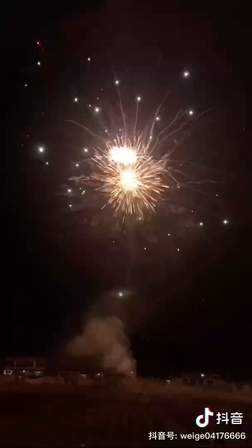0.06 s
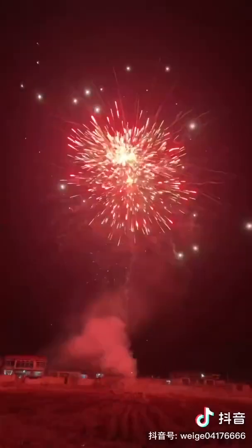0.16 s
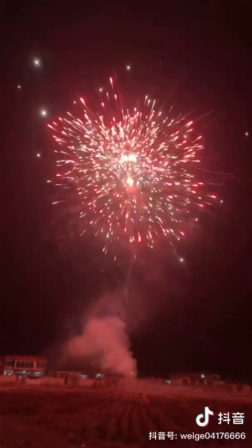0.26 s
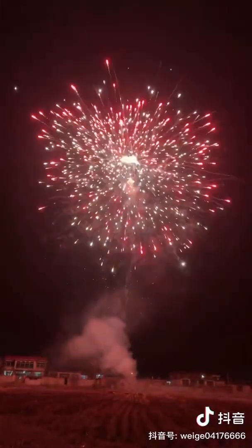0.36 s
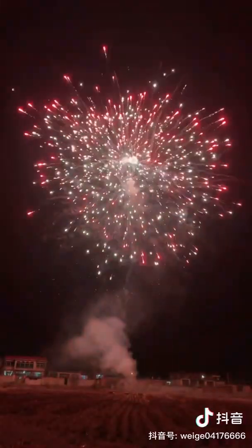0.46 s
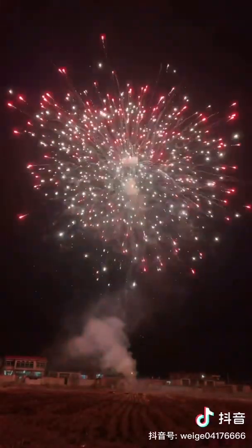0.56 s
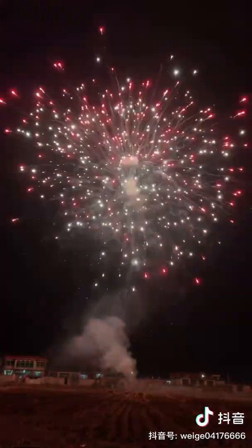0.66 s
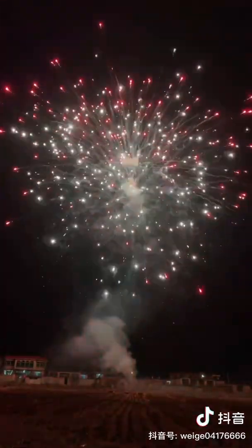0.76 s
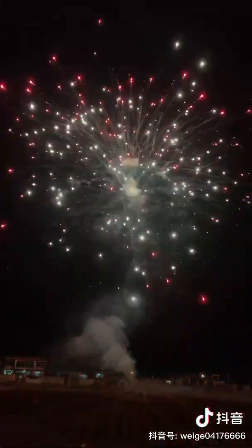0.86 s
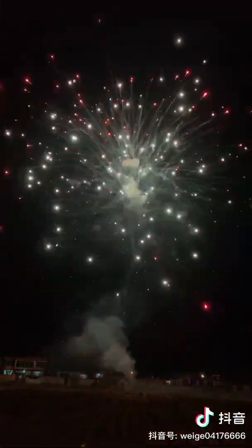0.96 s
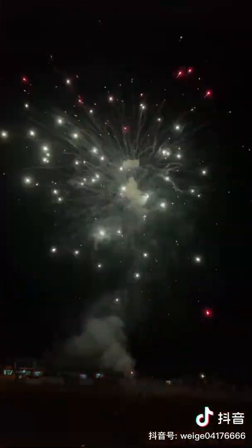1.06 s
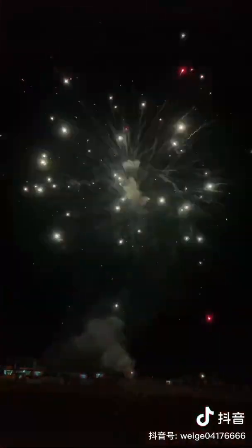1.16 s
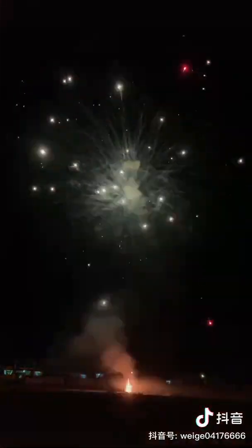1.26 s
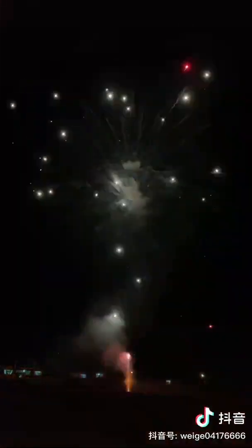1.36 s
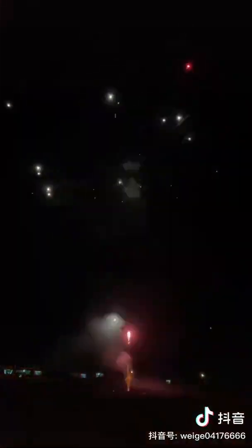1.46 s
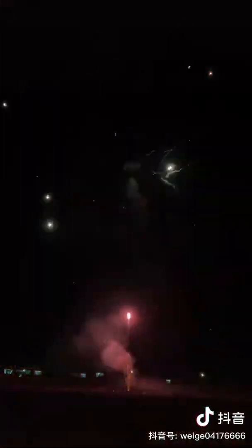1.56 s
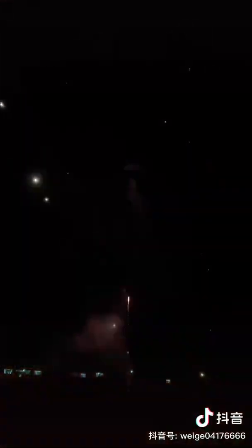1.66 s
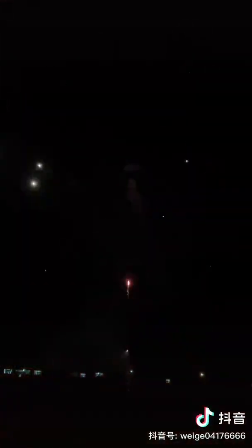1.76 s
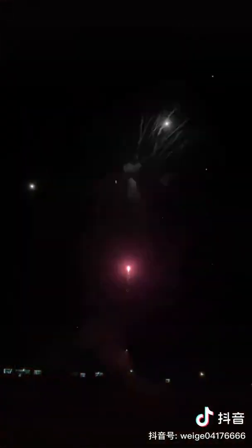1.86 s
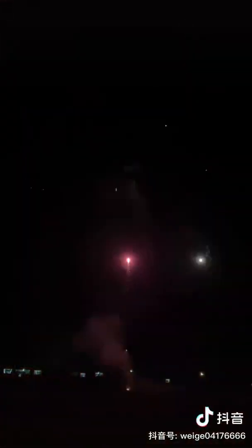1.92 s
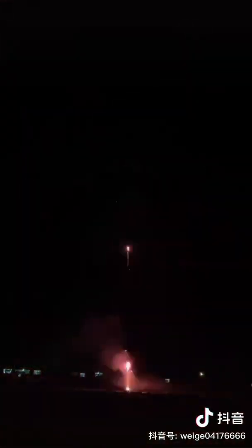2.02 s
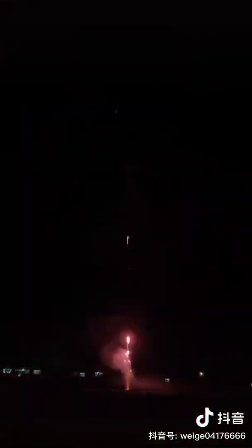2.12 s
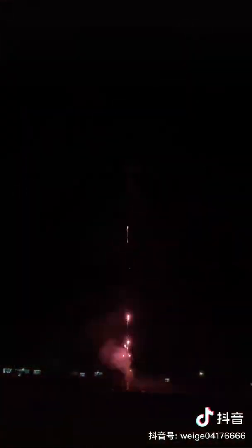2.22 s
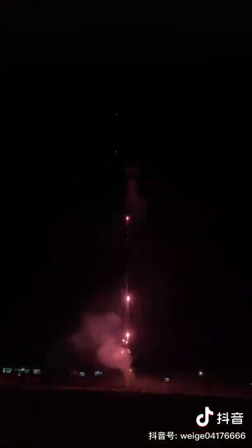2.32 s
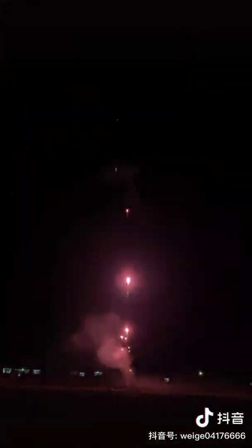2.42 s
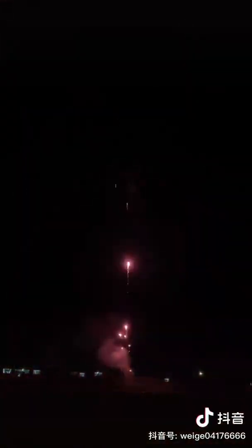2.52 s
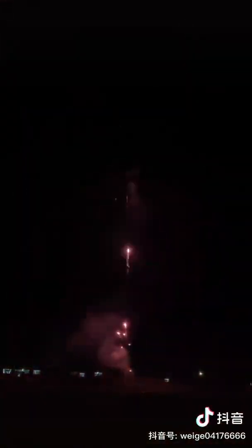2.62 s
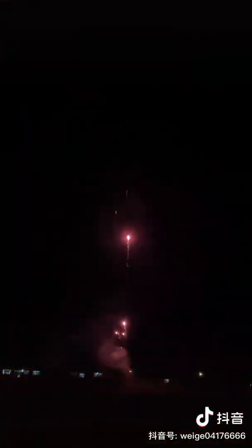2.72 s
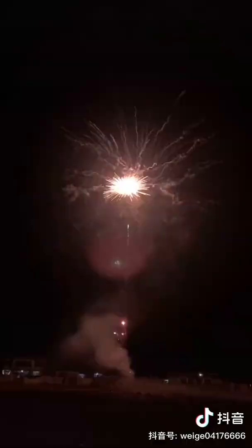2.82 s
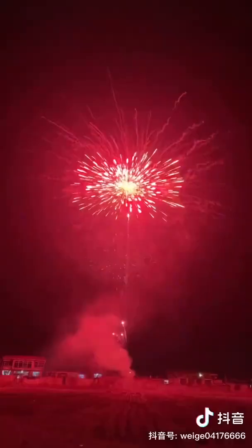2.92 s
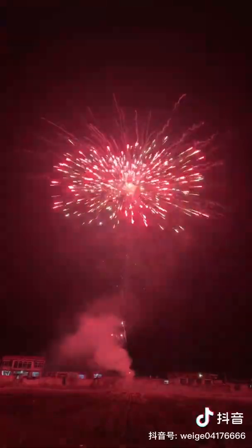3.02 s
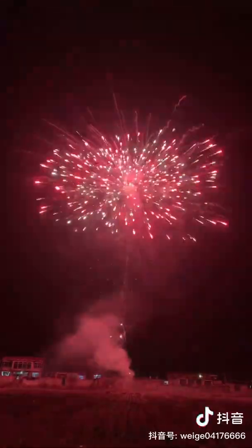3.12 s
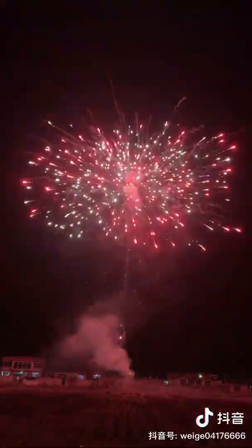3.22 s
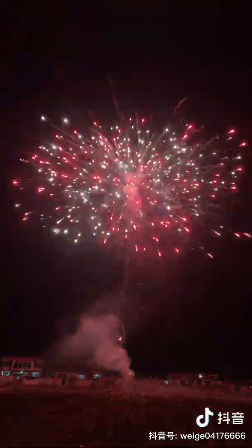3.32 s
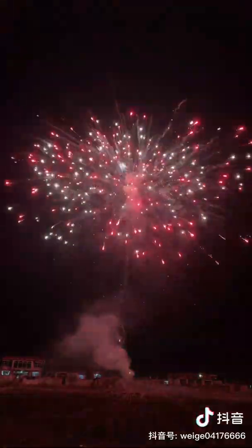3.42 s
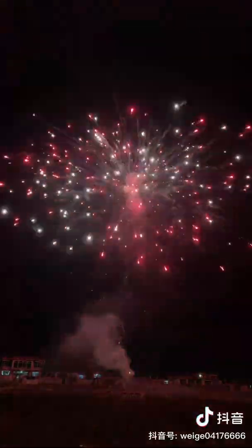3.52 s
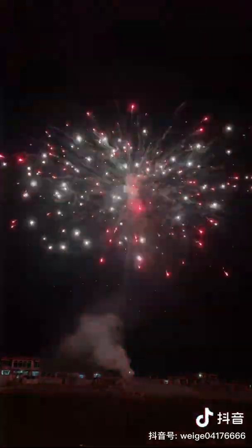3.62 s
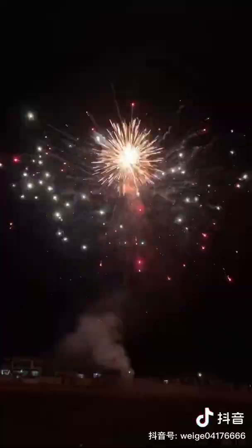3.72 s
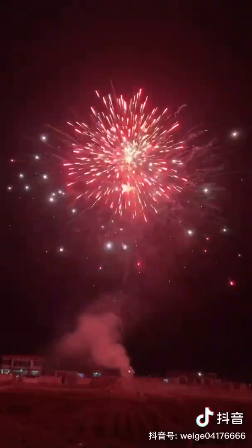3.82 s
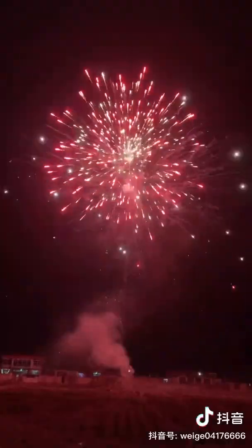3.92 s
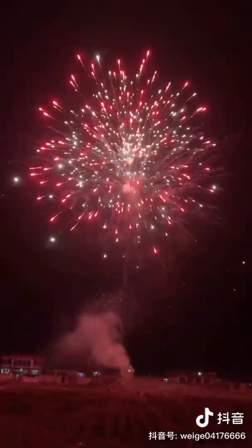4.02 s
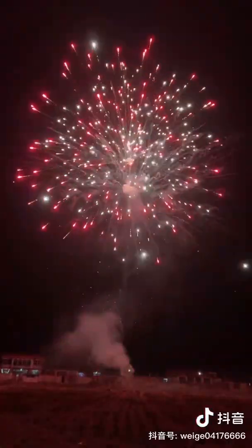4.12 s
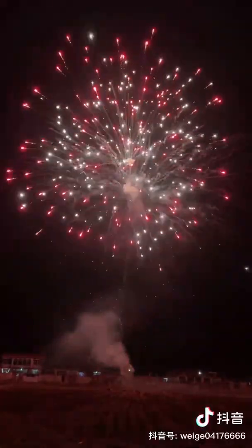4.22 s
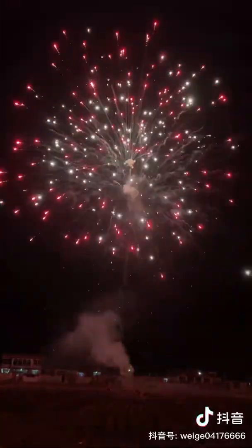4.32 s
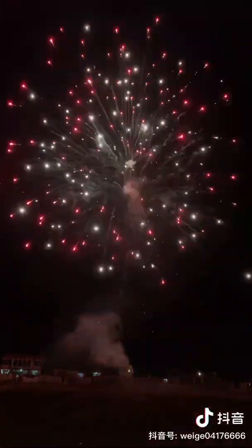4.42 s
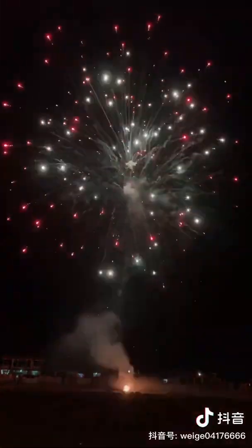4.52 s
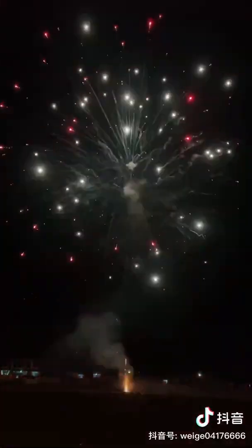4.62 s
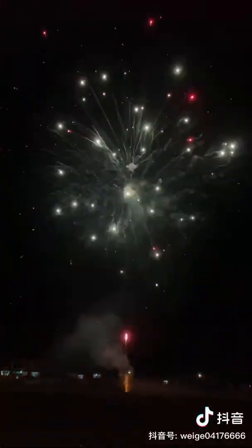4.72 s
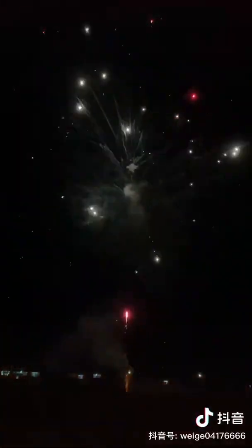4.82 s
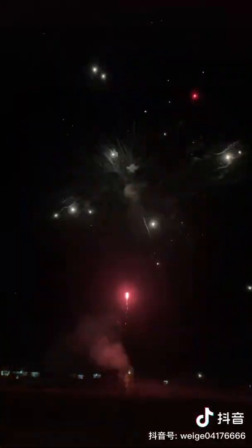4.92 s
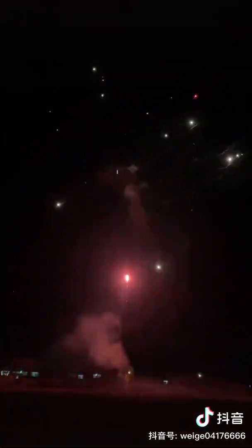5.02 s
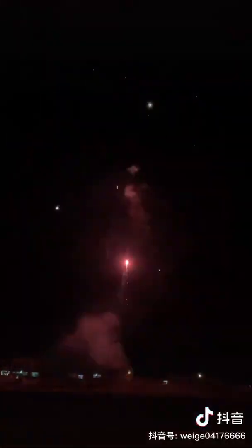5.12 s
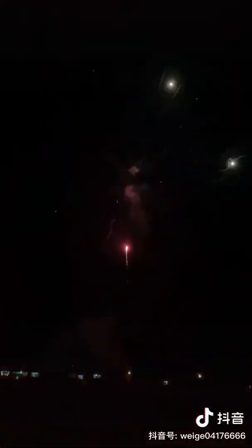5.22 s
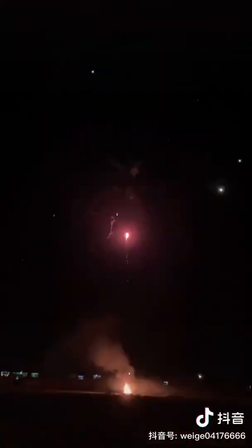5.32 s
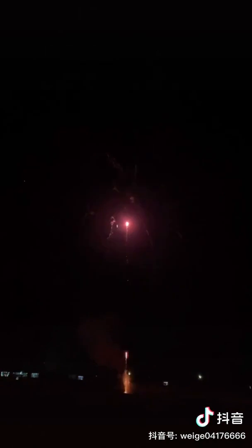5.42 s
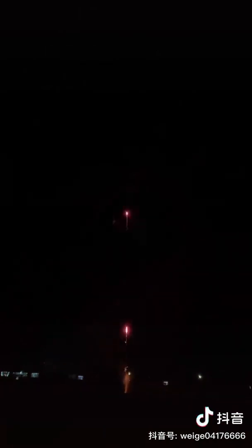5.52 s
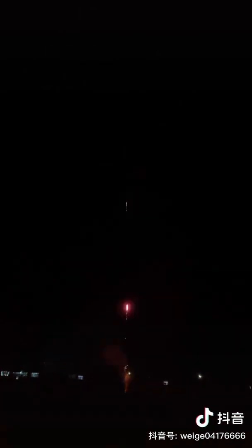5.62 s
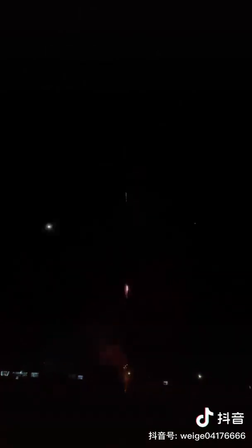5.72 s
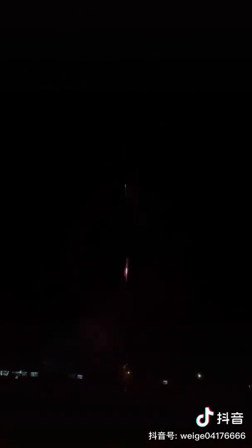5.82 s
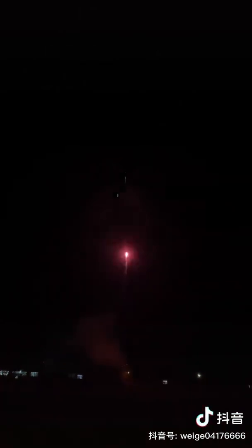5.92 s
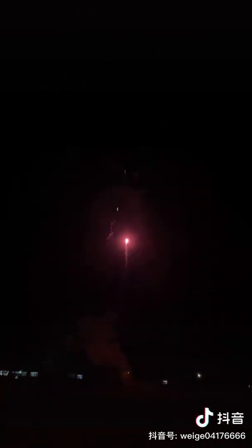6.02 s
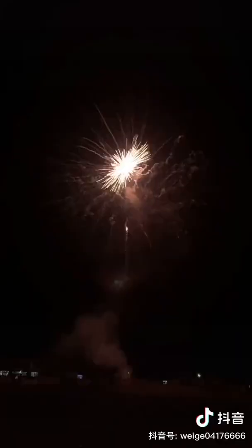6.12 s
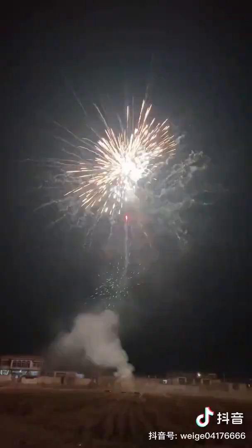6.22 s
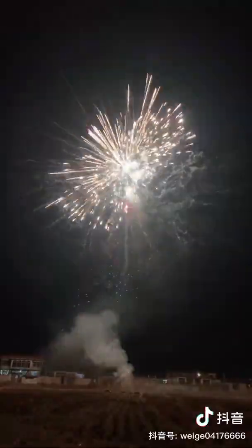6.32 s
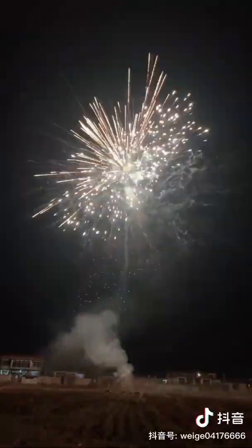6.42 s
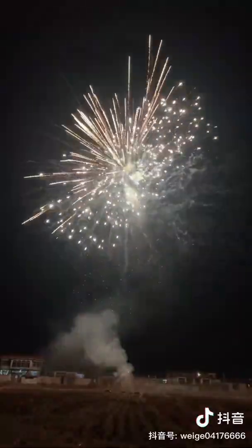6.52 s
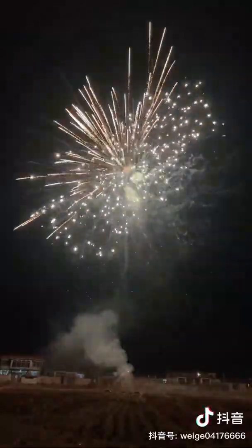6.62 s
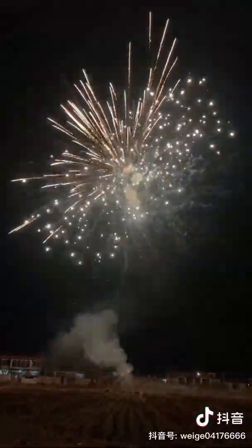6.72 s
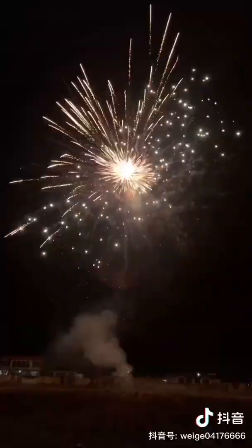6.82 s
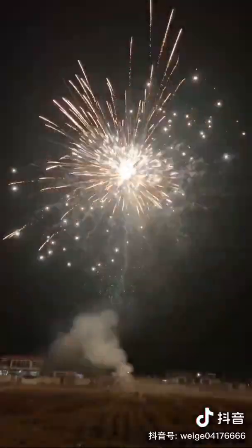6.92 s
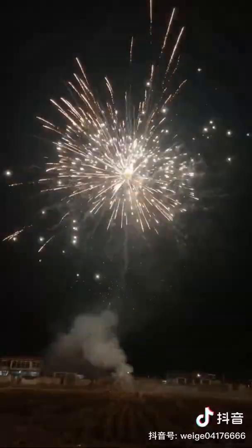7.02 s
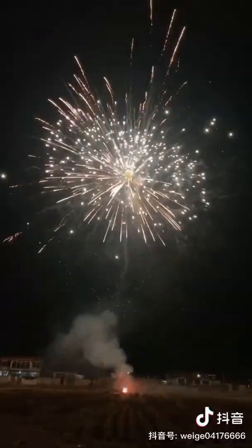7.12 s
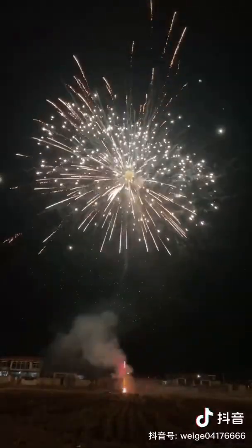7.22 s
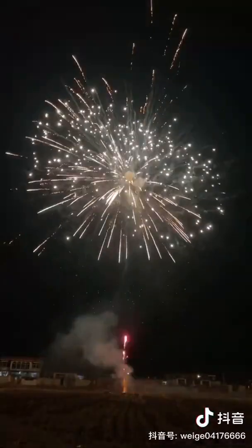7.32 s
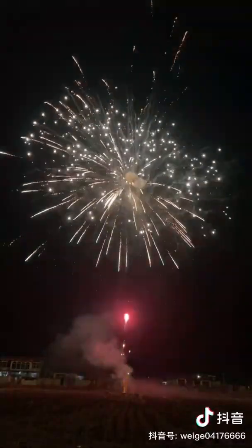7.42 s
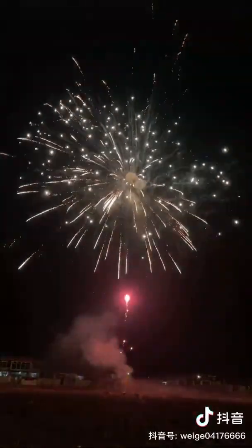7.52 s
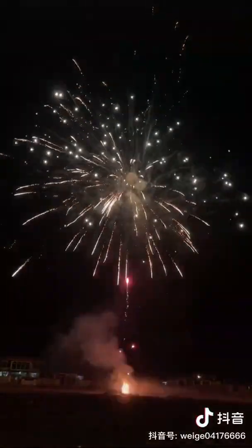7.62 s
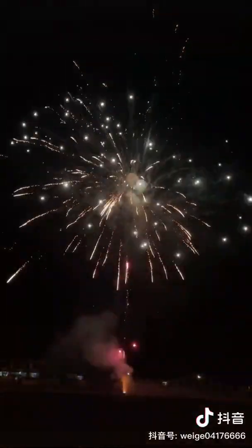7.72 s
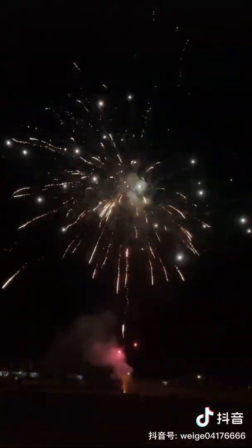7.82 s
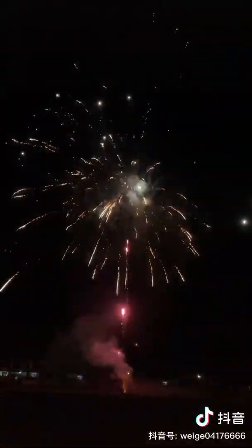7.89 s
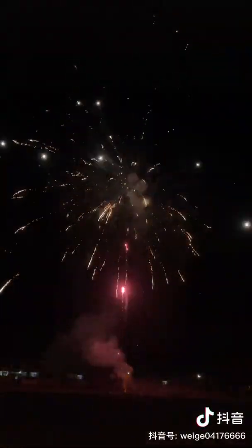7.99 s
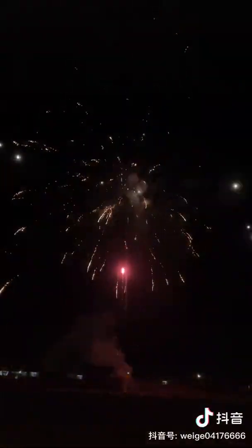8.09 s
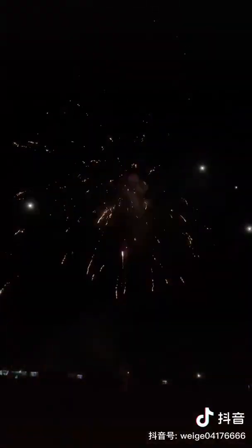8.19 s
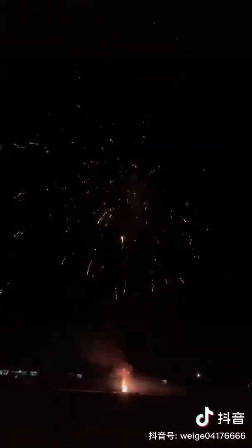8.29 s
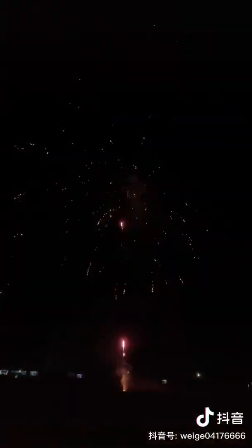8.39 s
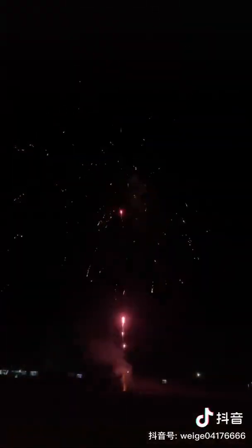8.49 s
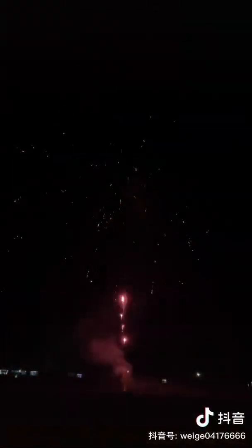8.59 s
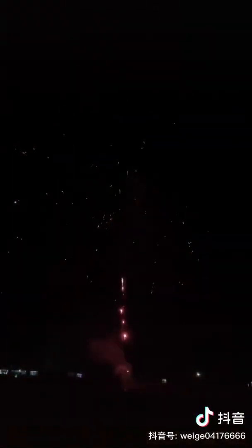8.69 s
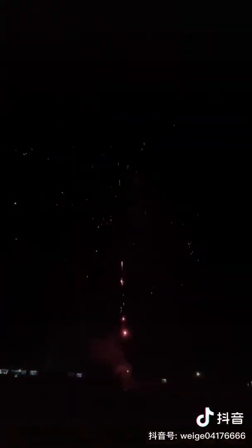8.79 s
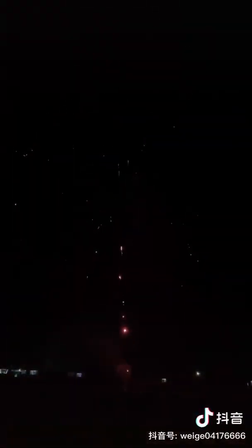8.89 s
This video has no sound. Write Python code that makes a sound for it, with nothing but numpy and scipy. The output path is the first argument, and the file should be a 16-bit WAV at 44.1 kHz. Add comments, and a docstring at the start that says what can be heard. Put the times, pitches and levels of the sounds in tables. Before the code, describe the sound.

A multi-shot firework goes off in an open field, some way from the microphone. Right at the start, about 0.2 seconds in, two sharp, loud bangs crack almost together overhead. Hollow knocks come back from houses, and a low roll swells, then darkens and fades over about two seconds. At 1.4 and 2.1 seconds, tubes launch shells, each with a quieter bass thump, a dry snap and a quick slapping echo. Two more shells burst at 3.0 and 3.8 seconds with the same rolling decay. Launches follow at 4.7 and 5.5 seconds, then another two bangs at 6.3 and 7.0 seconds. As their rumble dies away, three launches thump and snap at about 7.3, 7.8 and 8.4 seconds. A faint, restless distant rumble lies underneath throughout, with a few barely audible stray pops in the first four seconds.

```python
"""Sharp bangs crack overhead and roll away over an open field at night, darkening as they go.
They are shells from a firework cake, some way from a hand-held microphone; each burst is a shock front
that houses and land throw back. Between the bangs, tubes thump and snap as they lift their shells,
and house fronts slap the launches back. A far rumble and a few faint pops lie underneath."""
import sys
import numpy as np
from scipy import signal
from scipy.fft import rfft, irfft, next_fast_len
from scipy.io import wavfile
from scipy.ndimage import uniform_filter1d

SR = 44100
rng = np.random.default_rng(int(sys.argv[2]) if len(sys.argv) > 2 else 0)


def wav_record(signal):
    """Record a signal, one row per channel, as 16-bit PCM in the file named by sys.argv[1]."""
    frames = np.transpose(np.atleast_2d(signal))
    bounded = np.clip(frames, -1, 1)
    # unit amplitude maps onto the largest positive 16-bit level
    quanta = np.round(bounded * 32767).astype(np.int16)
    wavfile.write(sys.argv[1], SR, quanta)


N = 394694
SIZE = 8192  # FFT length for shaping one hit
HZ = np.fft.rfftfreq(SIZE, 1 / SR)

# bass thump of a tube, also the body of the echoes' boom: (frequency [Hz], level [dB])
THUMP = [(20, -0.5), (40, 20), (70, 37.5), (120, 42), (250, 38), (335, 28.5), (400, -1.5), (600, -36),
         (1000, -16.5), (4000, -40.5)]


def bursts():
    """Each shell bursts at another point of the sky, so each bang has its own roll."""
    # shell bursts: (time [s], bang [dB], low roll [dB], bright roll [dB], low roll pitch [ratio])
    shells = [(0.158, -1.5, -3.5, -4, 1.2), (0.2317, -1.5, -0.5, -2, 1.077), (2.9774, -1.5, 2, 0, 1.07),
              (3.8358, -0.5, -4, -5, 1.116), (6.2639, -1, -0.5, -1.2, 1.123),
              (6.9583, -1.5, -3.5, -4, 1.19)]
    # rows of houses answering a burst: (delay [s], boom [dB], knock [dB], spread [s])
    house_rows = [(.081, -13.5, -15.5, .006), (0.158, -6, -11, 0.013), (0.251, -10, -3.5, 0.039),
                  (.283, -9.5, -1.5, 0.013), (0.382, -12.5, 3, 0.02), (0.502, -27, -3, .008),
                  (0.599, -19, -14, 0.0076), (0.702, -18, -11.5, .008)]
    # the roll swells as the wave reaches more land; its bright part peaks later than the low
    low_shape = dict(start_db=-33, peak_s=.27, peak_db=-20.5, fall_db_per_s=26.5)
    bright_shape = dict(start_db=-53, peak_s=0.37, peak_db=-41.5, fall_db_per_s=20)
    out = np.zeros(N)
    for s, bang_db, low_db, bright_db, pitch in shells:
        add(out, s, amp(bang_db) * bang())
        for delay, boom_db, knock_db, spread_s in house_rows:
            add(out, s + delay, house_echo(delay, spread_s, low_db + boom_db, bright_db + knock_db))
        low, bright = roll(low_shape, bright_shape, pitch, length_s=2.3, sink=0.96, air_db=7.0,
                           grain_db=0.87, clump_db=1.3, ground_db=-23, ground_s=0.0069)
        add(out, s, amp(low_db) * low + amp(bright_db) * bright)
        walls = small_walls(first_s=0.15, last_s=1.2, level_db=-4, fall_db_per_s=11,
                            spread_s=0.0017, count=12)
        add(out, s, amp(bright_db) * walls)
    return out


def bang(push_s=.00485, fall_share=.92, fall_hz=460, spray_db=-20, spray_s=0.014):
    """A shock front, an inverted, softened copy of it about 5 ms later, and a brief spray off the ground."""
    # spectrum of the shock front: (frequency [Hz], level [dB])
    shock = [(20, 23), (55, 31), (100, 38), (300, 35), (400, 40.5), (520, 30.5), (700, 28.5), (930, 21.5),
             (1200, 17.5), (2100, 21), (3100, 17.5), (5200, 7.5), (8800, -9.5), (12000, -8.5), (15900, -26)]
    # microphone housing's notches for sound from overhead: (centre [Hz], half-width [Hz], depth [dB])
    notches = [(740, 21, 6), (2546, 76, 12), (4030, 100, 9.5), (4550, 200, 13), (6670, 60, 6),
               (10600, 200, 16), (14030, 410, 0)]
    housing_db = sum(db / (1 + ((HZ - hz) / width) ** 2) for hz, width, db in notches)
    front = pulse(curve_db(shock, HZ) - housing_db)
    fall = fall_share / (1 + (HZ / fall_hz) ** 3) * np.exp(-2j * np.pi * HZ * push_s)
    noise = noise_tail(spray_s)
    spray = amp(spray_db) * rfft(noise) / np.linalg.norm(noise) * HZ / (HZ + 600)
    return irfft(rfft(front, SIZE) * (1 - fall + spray))


def launches(wall_s=.0655, wall_thump_db=-20.5, wall_spread_s=.002, house_spread_s=0.0055):
    """Tubes thump and crack as they lift shells. All stand in one box, so the land answers each alike."""
    # tubes firing: (time [s], thump [dB], muzzle crack [dB], crack thrown to far houses [dB],
    # treble tilt [dB/octave], slap off the near wall [dB])
    tubes = [(1.37, -5, 2, -7.5, 2, -6), (2.09, -3, 5, -1.5, 0.5, -1), (4.675, -5, 3.5, -7, -1, 1.5),
             (5.4535, -3, 1.5, -2.5, -0.5, 0.5), (7.2776, -4.5, -2.5, -2.5, 3.5, 2.5),
             (7.75, -2.8, 1, -6, 2.5, -0.5), (8.384, -3.1, 3, -4.5, -0.5, -0.5)]
    # house fronts; only the large ones return the bass: (delay [s], boom [dB], knock [dB])
    house_fronts = [(.282, -19.5, -8), (0.296, -27.5, -11.5), (.312, -23, -15.5), (0.346, -32, -10.5),
                    (0.393, -33, -9.5), (.413, -32.5, -13), (.436, -33.5, -15.5), (.598, -36.5, -16.5)]
    # hard, bright slap off the nearest wall: (frequency [Hz], level [dB])
    slap_colour = [(100, -27), (900, -15.5), (1400, -2), (2100, -1), (2900, -20.5), (4100, -9), (5200, -31),
                   (7500, -34.5), (9500, -57), (16000, -55.5)]
    # a launch is at ground level, so its roll peaks early
    low_shape = dict(start_db=-43.5, peak_s=0.012, peak_db=-30.5, fall_db_per_s=32)
    bright_shape = dict(start_db=-82, peak_s=0.068, peak_db=-61, fall_db_per_s=23.5)
    low, bright = roll(low_shape, bright_shape, pitch=0.93, length_s=1.2, sink=0.92, air_db=2.5,
                       grain_db=2.0, clump_db=6.5, ground_db=-40, ground_s=0.011)
    walls = small_walls(first_s=.085, last_s=.8, level_db=-17, fall_db_per_s=10, spread_s=.002, count=18)
    thump = pulse(curve_db(THUMP, HZ))
    out = np.zeros(N)
    for s, thump_db, crack_db, thrown_db, tilt_db, slap_db in tubes:
        add(out, s, amp(thump_db) * thump + amp(crack_db) * crack(tilt_db))
        slap = smear(pulse(curve_db(slap_colour, HZ)), wall_spread_s)
        add(out, s + wall_s, amp(thump_db + wall_thump_db) * thump + amp(slap_db) * slap)
        for delay, boom_db, knock_db in house_fronts:
            echo = house_echo(delay, house_spread_s, thump_db + boom_db, thrown_db + knock_db)
            add(out, s + delay, echo)
        add(out, s, amp(thump_db) * low + amp(thrown_db) * bright)
        add(out, s, amp(thrown_db) * walls)
    return out


def crack(tilt_db, spit_s=0.0022):
    """A dry snap from a spit of gas, brighter or duller by its tilt per octave."""
    # spectrum of the muzzle crack: (frequency [Hz], level [dB])
    snap = [(100, -4.5), (500, -2.5), (900, -18), (1300, 3), (1950, 4.5), (2350, -2), (3000, -17),
            (3900, -12.5), (6000, -25.5), (10000, -37), (16000, -43)]
    octaves = np.log2(np.clip(HZ, 1000, 5000) / 2000)
    return smear(pulse(curve_db(snap, HZ) + tilt_db * octaves), spit_s)


def roll(low_shape, bright_shape, pitch, length_s, sink, air_db, grain_db, clump_db, ground_db, ground_s):
    """The land scatters a shot as a low and a bright tail; longer paths come back deeper and duller."""
    # deep scatter off the land: (frequency [Hz], relative level [dB])
    low_colour = [(15, -40.5), (35, -23), (65, -1), (120, 9), (200, 1), (280, -11.5), (350, -31),
                  (430, -36), (900, -61), (3000, -100)]
    # bright scatter off walls and trees: (frequency [Hz], relative level [dB])
    bright_colour = [(150, -24), (400, -6.5), (600, 1.5), (900, -2.5), (1400, 4), (2000, -4), (2800, -13.5),
                     (4200, -17), (6500, -31), (9500, -39.5), (12000, -45.5), (16000, -54)]
    middle_s = 0.26  # age at which sinking and dulling are neutral

    def sinking(hz, age):
        ratio = pitch * np.exp(-sink * (np.minimum(age, .62) - middle_s))
        return curve_db(low_colour, hz / ratio)

    def dulling(hz, age):
        absorbed_db = air_db * np.minimum(hz, 8000) / 1000 * (np.clip(age, .17, 1.1) - middle_s)
        return curve_db(bright_colour, hz) - absorbed_db

    t = np.arange(int(length_s * SR)) / SR
    low = rumble(len(t), sinking, grain_db=3.0)
    bright = scatter(len(t), dulling, grain_db, size=512)
    low /= np.sqrt(uniform_filter1d(low ** 2, size=3600) + 1e-9)  # evened out, so the swell shapes it
    clumps = clump_db * flicker(len(t), step_s=0.0091)  # groups of walls and trees answer together
    splash = amp(ground_db) * np.exp(-t / ground_s)  # the near ground answers first
    return low * amp(swell(t, **low_shape)), bright * (amp(swell(t, **bright_shape) + clumps) + splash)


def swell(t, start_db, peak_s, peak_db, fall_db_per_s):
    """Envelope of a roll in dB: a rise to its peak, then an even fall."""
    return np.interp(t, [0, peak_s], [start_db, peak_db]) - fall_db_per_s * np.maximum(t - peak_s, 0)


def house_echo(delay, spread_s, boom_db, knock_db):
    """A house front returns a hollow knock and a soft boom, whose upper bass the fields absorb."""
    ground_loss_db = 22 * delay * np.minimum(HZ / 300, 2) ** 2  # 22 dB per second at 300 Hz
    boom = pulse(curve_db(THUMP, HZ) - ground_loss_db)
    return amp(boom_db) * boom + amp(knock_db) * knock(delay, spread_s)


def small_walls(first_s, last_s, level_db, fall_db_per_s, spread_s, count):
    """Sheds and walls at chance distances, each returning a faint knock."""
    out = np.zeros(int(last_s * SR) + SIZE)
    for k, (place, strength) in enumerate(rng.random((count, 2))):
        delay = first_s + (last_s - first_s) * (k + place) / count
        add(out, delay, strength * amp(level_db - fall_db_per_s * delay) * knock(delay, spread_s))
    return out


def knock(delay, spread_s, air_db_per_khz_s=9):
    """A far echo, smeared by the depth of the houses; the longer its path, the duller it is."""
    # a crack comes back hollow from far houses: (frequency [Hz], level [dB])
    hollow = [(100, -15.5), (500, -3.5), (900, -11), (1300, 8.5), (2100, 0), (2700, -19.5), (4200, -18.5),
              (6000, -33), (10000, -61.5)]
    absorbed_db = air_db_per_khz_s * delay * np.maximum(HZ - 2000, 0) / 1000
    return smear(pulse(curve_db(hollow, HZ) - absorbed_db), spread_s)


def night(bed_db=-45.5, linger_db=-40.5, fall_db_per_s=14, swell_db=2):
    """A restless far rumble, in which earlier shots die away, with a few stray pops on top."""
    # the night's rumble: (frequency [Hz], relative level [dB])
    bed_colour = [(18, -40.5), (35, -15.5), (65, 2.5), (100, 6), (160, -16.5), (250, -18.5), (370, -21.5),
                  (520, -15.5), (850, -29), (1400, -22.5), (2100, -38), (2900, -48), (4200, -56),
                  (8000, -68.5)]
    # faint stray pops: (time [s], peak [dB])
    pops = [(0.0448, -36), (1.132, -38), (3.81, -39)]
    level = amp(bed_db) + amp(linger_db - fall_db_per_s * np.arange(N) / SR)
    wander = amp(swell_db * flicker(N, step_s=0.14))
    out = level * wander * rumble(N, lambda hz, age: curve_db(bed_colour, hz), grain_db=4.0)
    for s, peak_db in pops:
        pop = crack(tilt_db=-4.5)
        add(out, s, amp(peak_db) * pop / abs(pop).max())
    return out


def rumble(length, colour, grain_db):
    """Deep scatter with the infrasound cut away."""
    low_cut = signal.butter(4, 42, "high", fs=SR, output="sos")
    return signal.sosfilt(low_cut, scatter(length, colour, grain_db, size=2048))


def scatter(length, colour, grain_db, size):
    """Countless small reflections of uneven strength, rms near 1; colour(hz, age) shapes them in dB."""
    grains = amp(grain_db * np.repeat(rng.standard_normal(length // 64 + 1), 64)[:length])
    noise = rng.standard_normal(length) * grains / np.sqrt(np.mean(grains ** 2))
    hz, age, frames = signal.stft(noise, SR, nperseg=size)
    gain = amp(colour(hz[:, None], age))
    gain /= np.sqrt(np.mean(gain ** 2, 0))
    return signal.istft(frames * gain, SR, nperseg=size)[1][:length]


def pulse(db):
    """The most abrupt causal click that has this spectrum (minimum phase)."""
    log_gain = np.log(amp(np.maximum(db, -100)))
    mirrored = np.concatenate([log_gain, log_gain[-2:0:-1]])
    return np.fft.ifft(np.exp(np.conj(signal.hilbert(mirrored)))).real[:SIZE // 2]


def smear(sound, decay_s):
    """Spreads a click in time, as a rough wall or a spit of gas does, keeping its overall colour."""
    diffusion = rfft(noise_tail(decay_s))
    diffusion /= np.sqrt(uniform_filter1d(abs(diffusion) ** 2, size=160))
    return irfft(rfft(sound, SIZE) * diffusion)[:SIZE // 2]


def noise_tail(decay_s):
    """A puff of white noise that dies away."""
    return rng.standard_normal(SIZE) * np.exp(-np.arange(SIZE) / SR / decay_s)


def flicker(length, step_s):
    """A random wander of unit size that glides to a new value every step."""
    steps = np.arange(length) / (step_s * SR)
    return np.interp(steps, np.arange(SIZE), rng.standard_normal(SIZE))


def curve_db(points, hz):
    """An EQ curve in dB, its points joined on a log-frequency axis."""
    point_hz, db = np.transpose(points)
    return np.interp(np.log(hz + 1), np.log(point_hz), db)


def amp(db):
    """Decibels to gain."""
    return 10 ** (np.asarray(db) / 20)


def add(mix, s, sound):
    """Lays a sound into the mix at time s."""
    part = mix[max(round(s * SR), 0):][:len(sound)]
    part += sound[:len(part)]


def scene():
    """Bursts, launches and the night around them, in mono."""
    return (bursts() + launches() + night())[None]


def record(dry, bass_lag_s=.024, lag_hz=80, ceiling=.85, top_hz=15900):
    """The recorder's filters pass bass late, so each bang chirps downward; peaks are rounded off."""
    length = next_fast_len(N + SIZE)
    hz = np.fft.rfftfreq(length, 1 / SR)
    lag_s = bass_lag_s / (1 + (hz / lag_hz) ** 1.4)
    allpass = np.exp(-2j * np.pi * np.cumsum(lag_s) * hz[1])
    chirped = irfft(rfft(dry, length) * allpass, length)[:, :N]
    rounded = chirped / (1 + (chirped / ceiling) ** 8) ** (1 / 8)
    high_cut = signal.firwin(255, top_hz, window=("kaiser", 9), fs=SR)
    return signal.oaconvolve(rounded, high_cut[None], "same")


dry = scene()
out = record(dry)
wav_record(out)
```